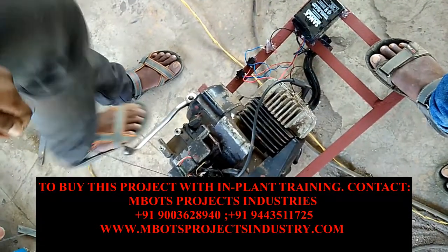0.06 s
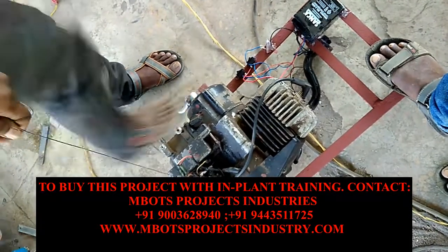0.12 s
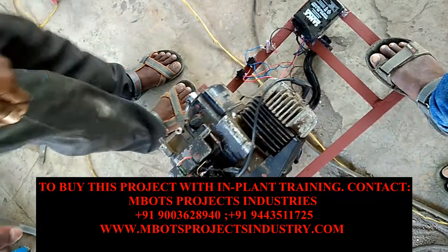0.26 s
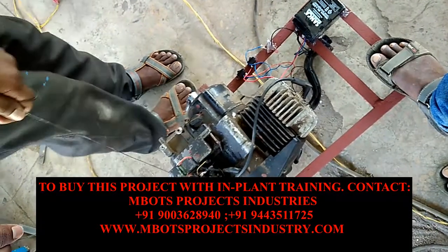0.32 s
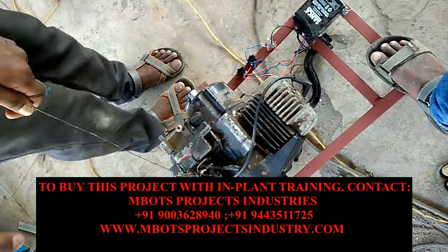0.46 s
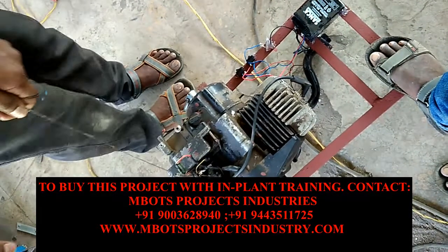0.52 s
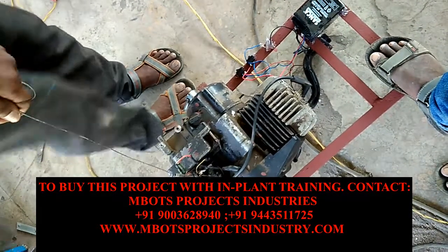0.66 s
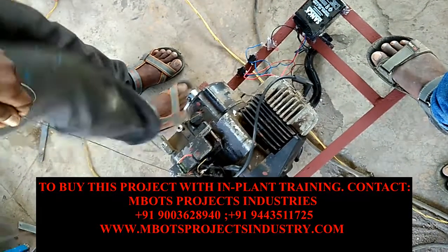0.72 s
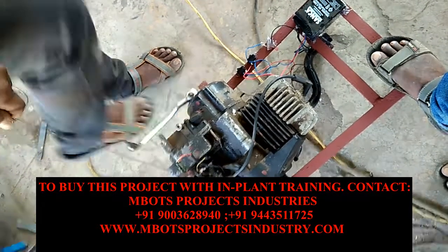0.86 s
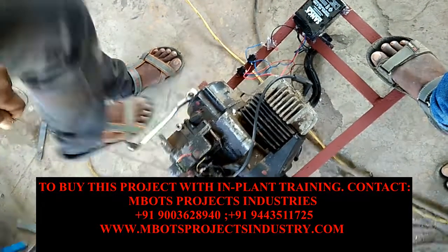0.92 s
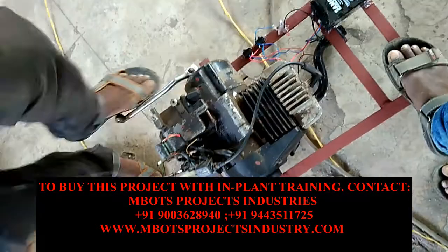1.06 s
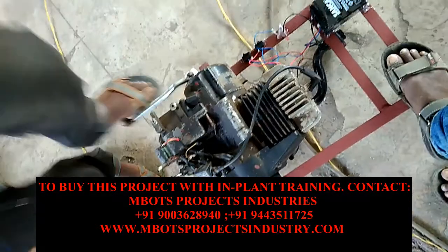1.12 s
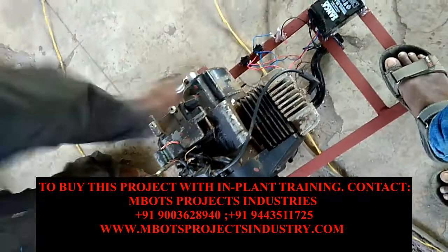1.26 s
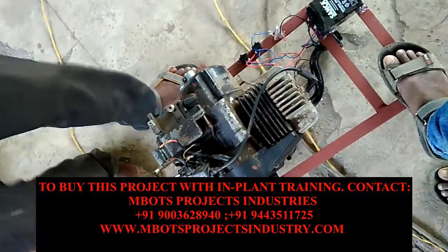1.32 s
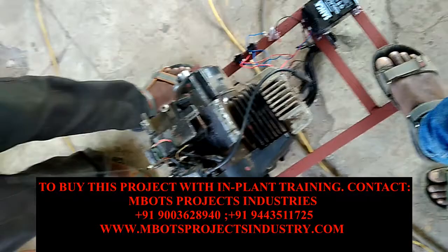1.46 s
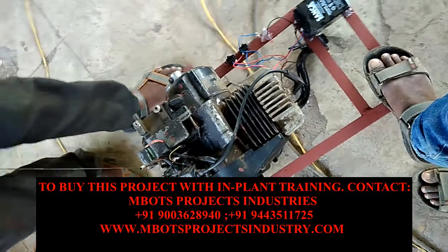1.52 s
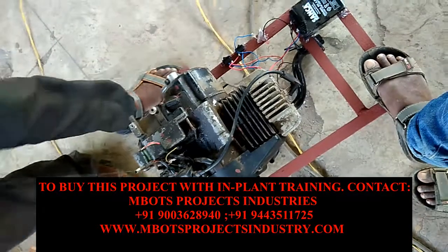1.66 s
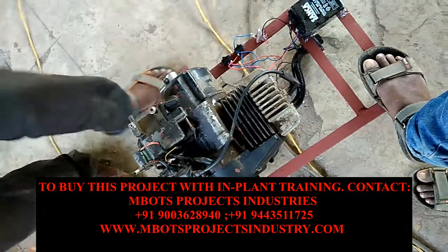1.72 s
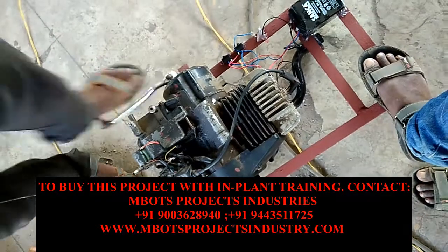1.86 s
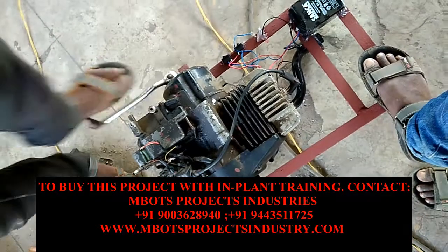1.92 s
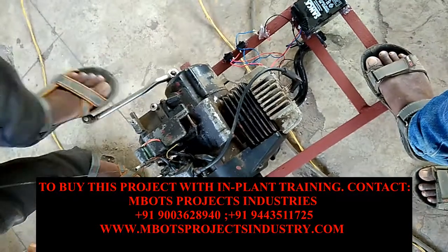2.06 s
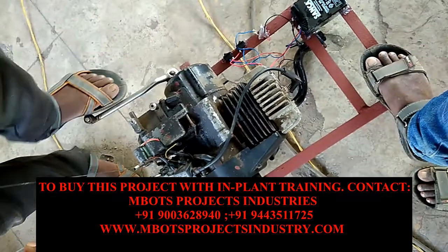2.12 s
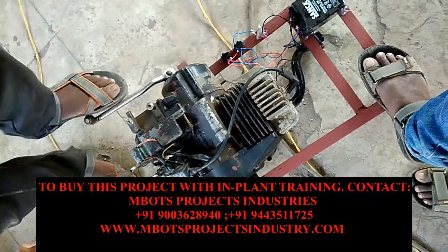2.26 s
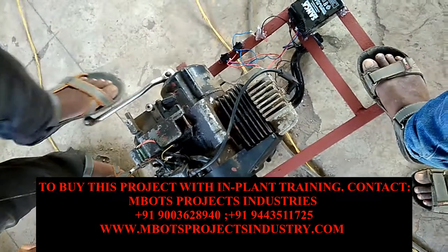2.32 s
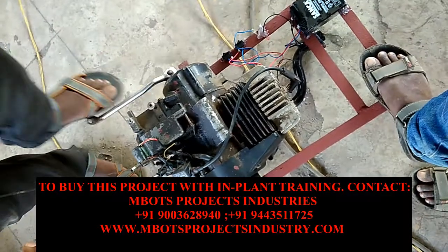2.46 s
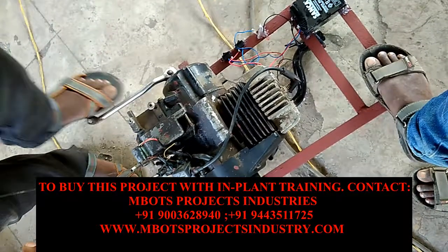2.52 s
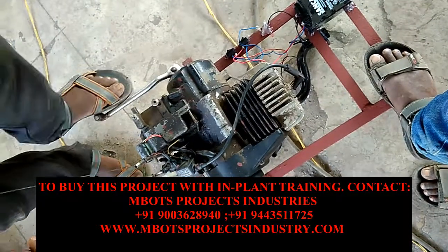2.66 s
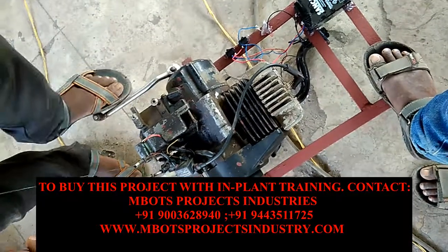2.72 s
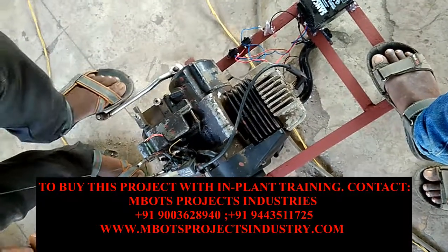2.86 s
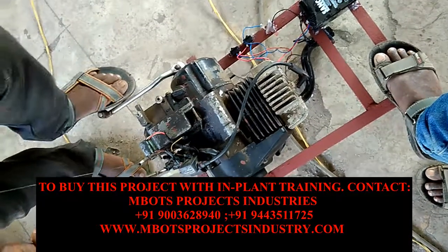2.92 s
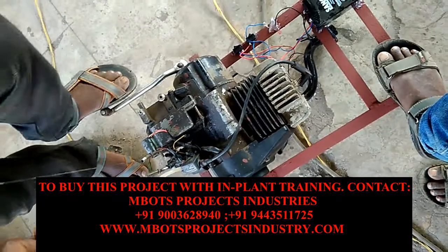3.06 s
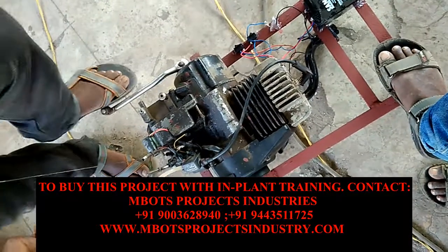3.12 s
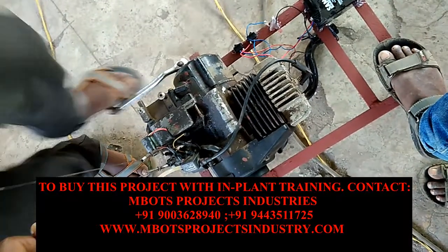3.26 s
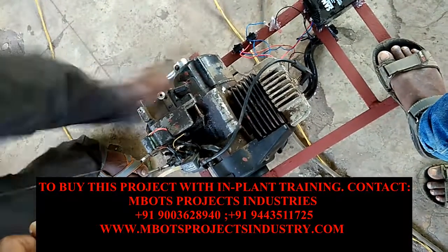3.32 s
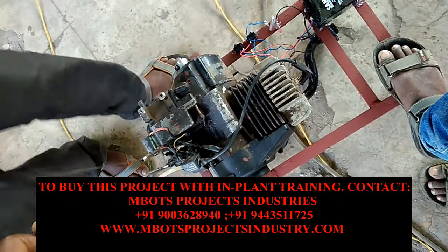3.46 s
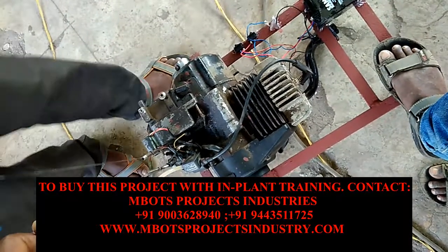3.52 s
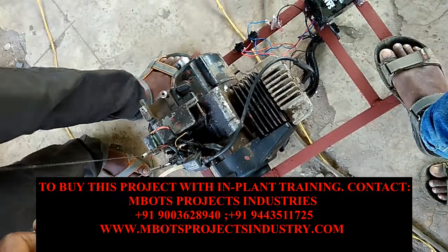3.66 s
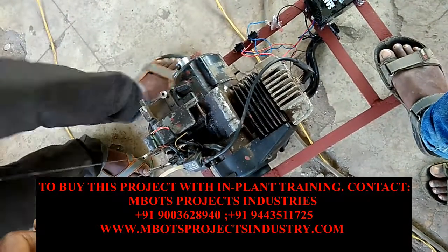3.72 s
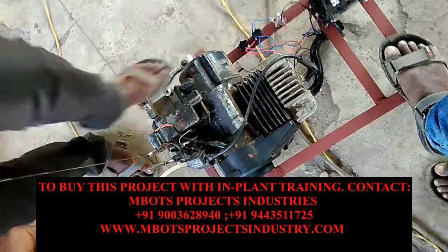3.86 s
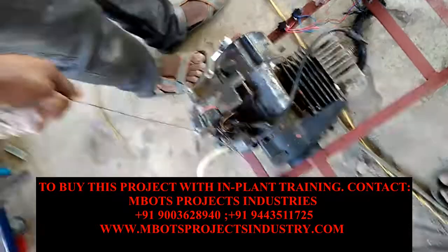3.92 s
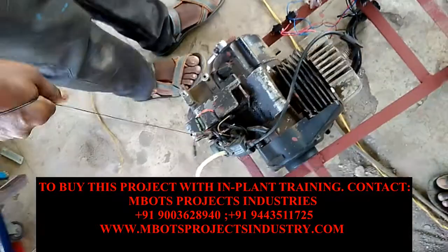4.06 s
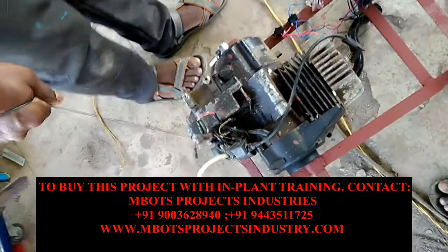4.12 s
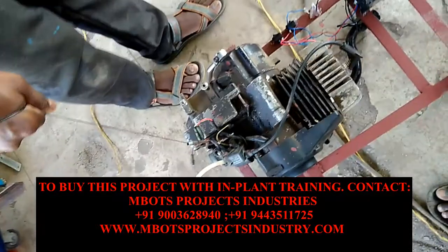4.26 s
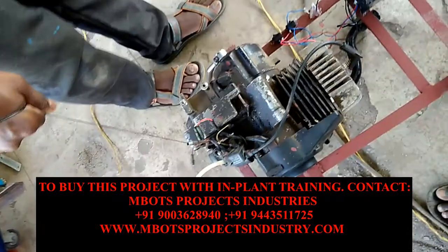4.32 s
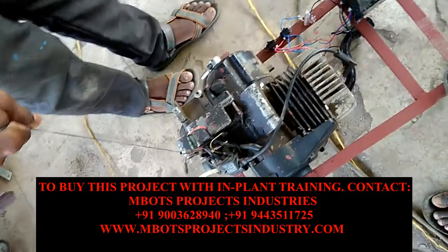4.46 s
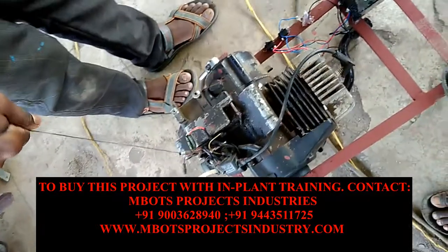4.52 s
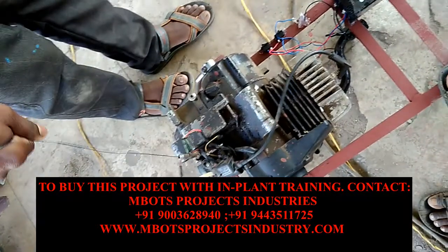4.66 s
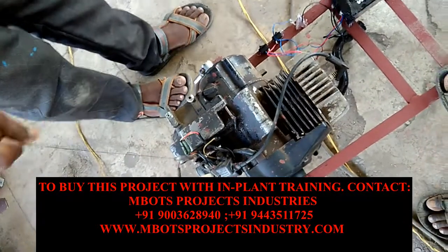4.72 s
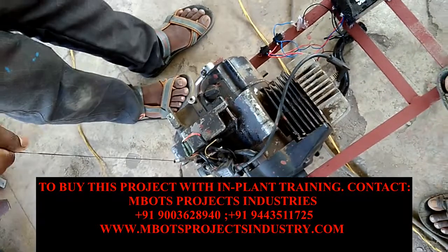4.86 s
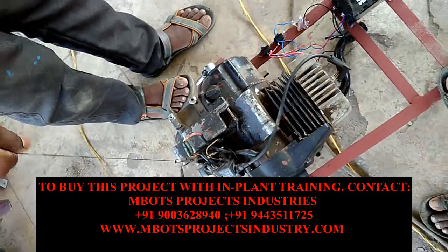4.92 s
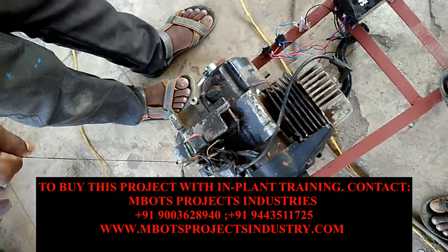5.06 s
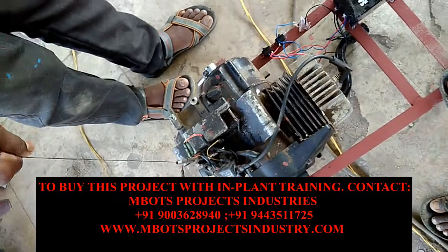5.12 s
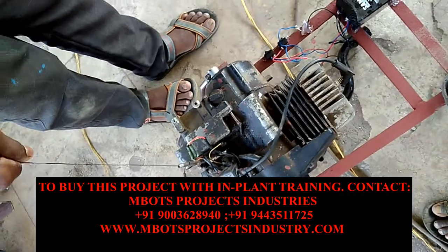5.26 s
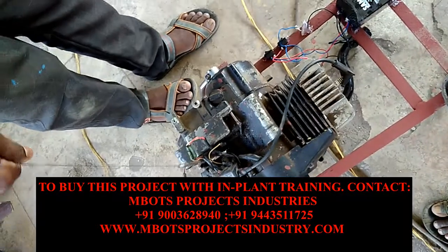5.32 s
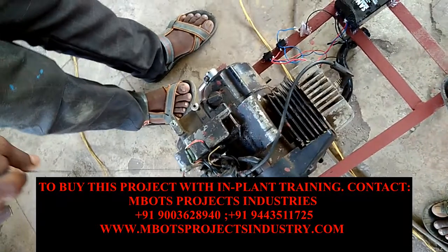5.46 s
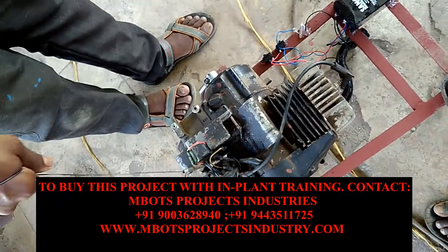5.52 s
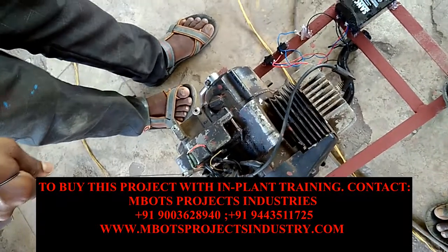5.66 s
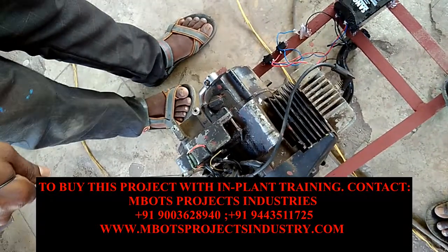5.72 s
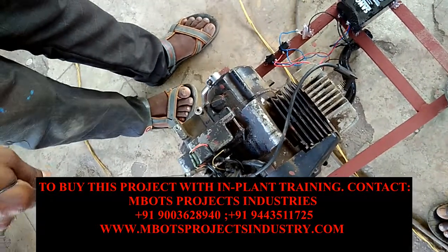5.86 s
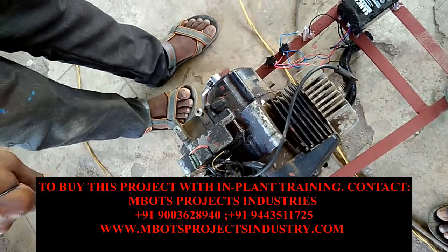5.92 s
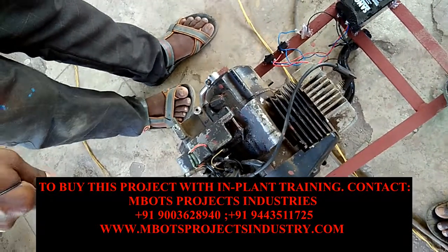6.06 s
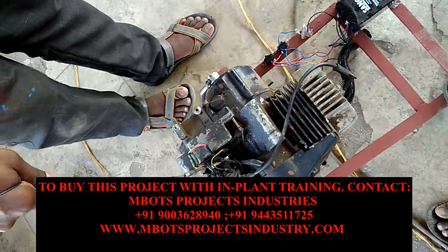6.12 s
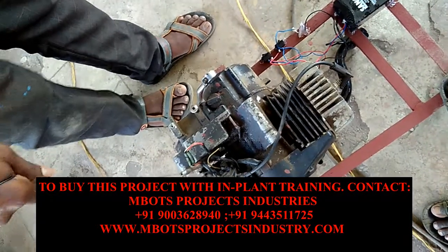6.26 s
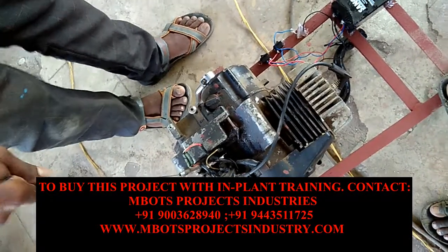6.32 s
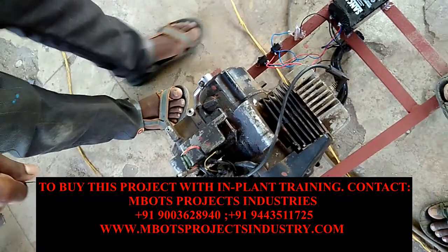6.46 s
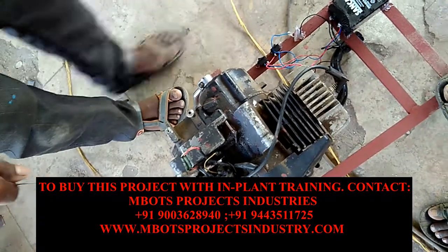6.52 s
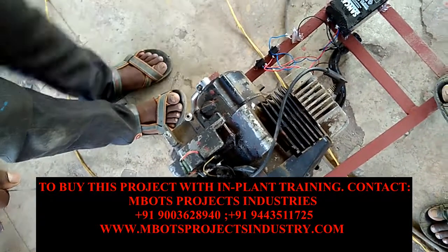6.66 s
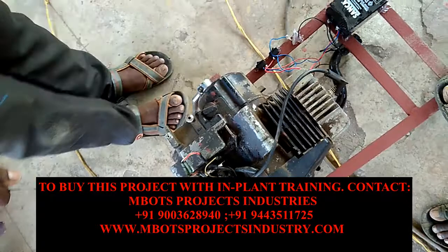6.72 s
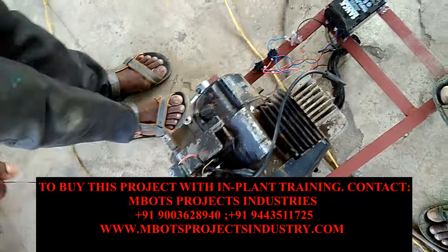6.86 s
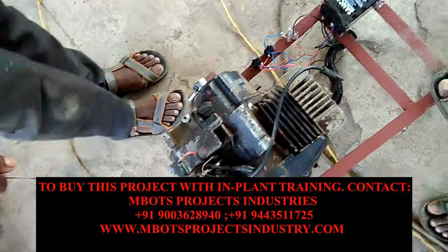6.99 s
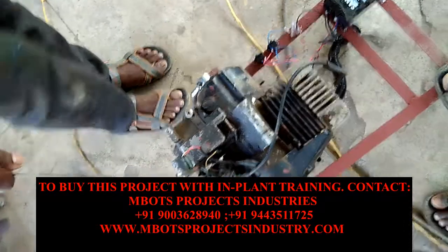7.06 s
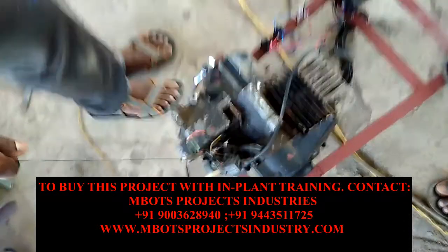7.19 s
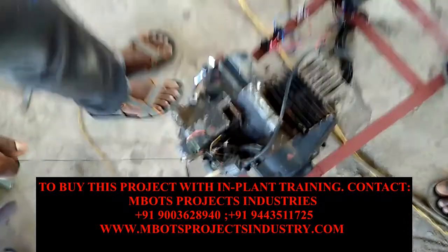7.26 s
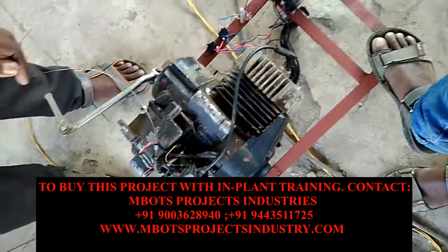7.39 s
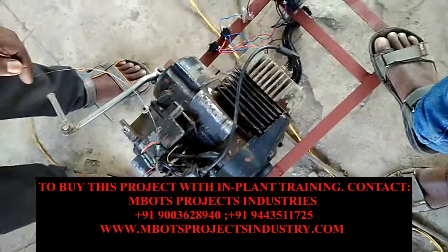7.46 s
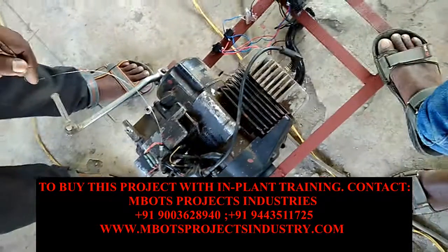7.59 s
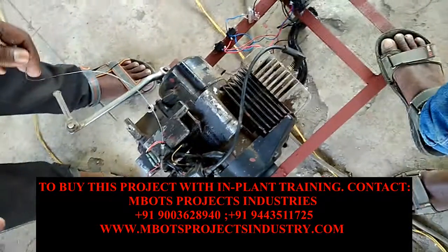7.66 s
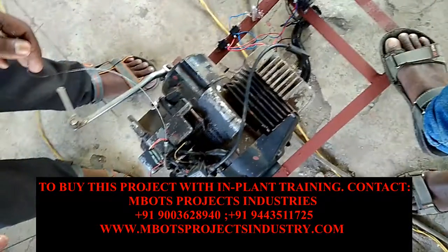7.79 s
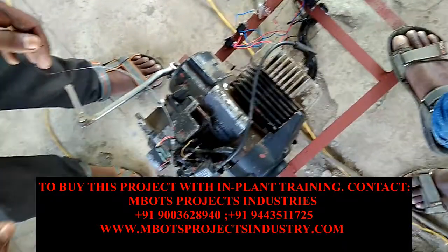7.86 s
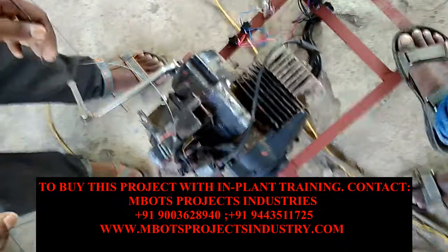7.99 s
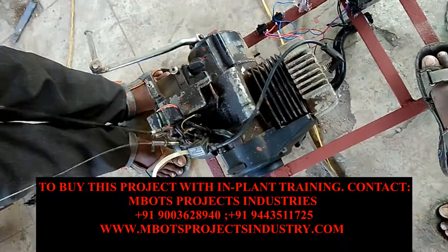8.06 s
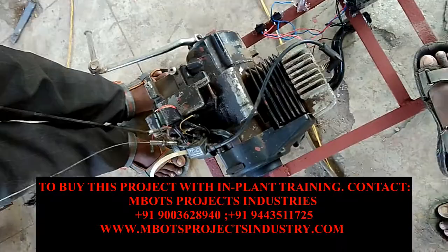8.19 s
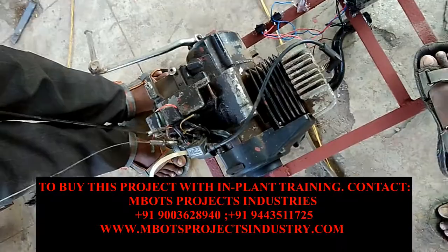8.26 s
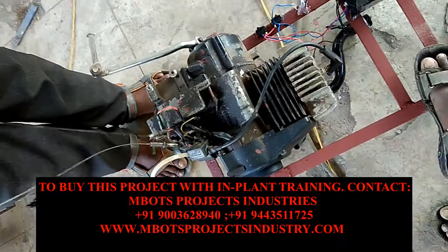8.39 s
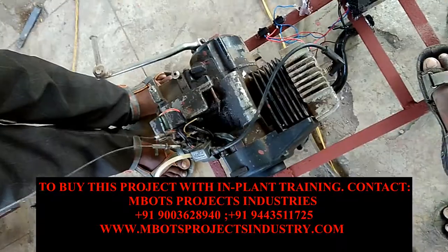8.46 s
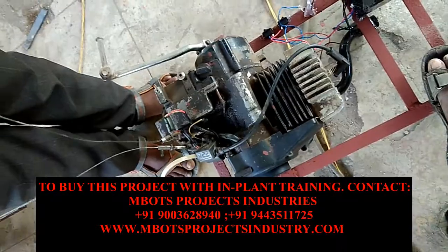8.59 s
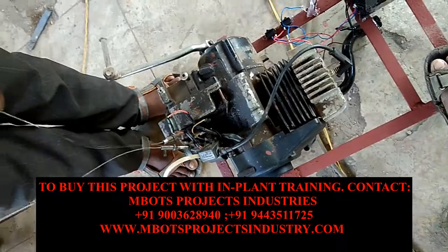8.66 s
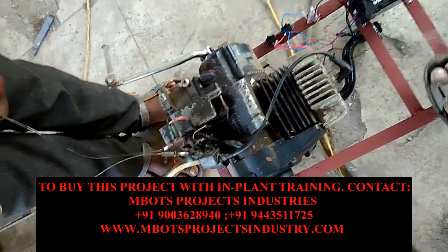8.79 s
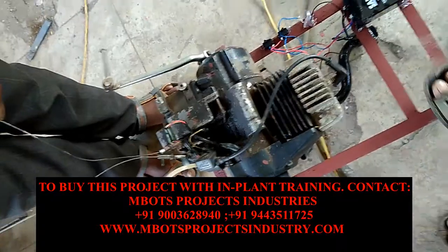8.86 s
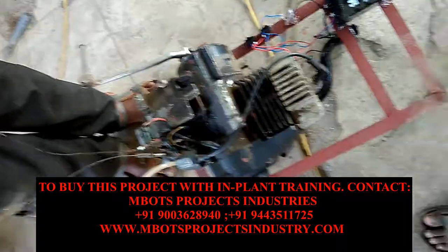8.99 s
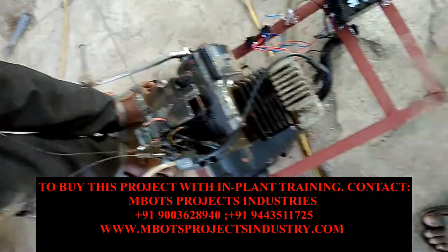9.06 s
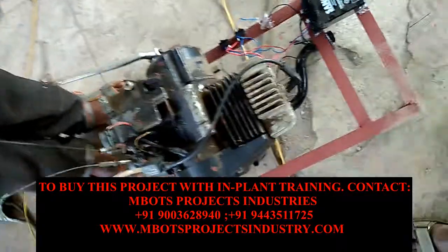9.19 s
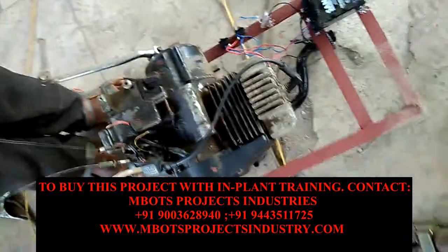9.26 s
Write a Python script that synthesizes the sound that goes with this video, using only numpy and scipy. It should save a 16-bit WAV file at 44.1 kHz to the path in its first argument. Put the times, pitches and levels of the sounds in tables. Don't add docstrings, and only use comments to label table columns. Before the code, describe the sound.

A small piston engine on a steel frame, heard very close in stereo, slightly stronger on the left, with short reflections from the concrete. Three kick strokes each click, whirr and chuff to a stop. Loud air jets then spin it into a quick, rough putter with a roaring pipe. The air stops, puffs slow and die, small spurts tick, and a short spin leads to a final run of hissing, buzzing pops.

```python
import sys
import numpy as np
from scipy import signal
from scipy.fft import rfft, irfft
from scipy.io import wavfile
from scipy.ndimage import uniform_filter1d

SR = 44100
rng = np.random.default_rng(int(sys.argv[2]) if len(sys.argv) > 2 else 0)


def pcm_store(signal):
    levels = np.round(np.clip(np.atleast_2d(signal), -1, 1) * 32767)
    wavfile.write(sys.argv[1], SR, levels.astype(np.int16).T)


def voltage_ratio(decibels):
    exponent = np.asarray(decibels, float) / 20
    return 10 ** exponent


N = 410571

# puff level/dB, pipe ring level/dB, puff f/Hz, swings to fade
STROKES = [(-22, -27, 140, .8), (-48.5, -42, 110, 0.28), (-23, -21.5, 130, .8), (-20, -22, 128, 0.64),
           (-43, -42, 100, 0.76), (-22, -22.5, 300, 3.5), (-20.5, -25.5, 330, 1.2), (-34, -29.5, 207, 1.3),
           (-40, -45, 160, 1.9), (-38, -27.5, 180, 1), (-38, -44, 210, 1.2), (-35.5, -35.5, 340, 1.7),
           (-42.5, -23.5, 310, 1.3), (-41, -31.5, 230, 1.1), (-23, -26.5, 297, 1.3), (-29, -30, 260, 1),
           (-29.5, -37, 190, 0.48), (-32.5, -38, 135, 0.31), (-38, -44, 104, 0.53), (-54.5, -62, 110, 0.59),
           (-33, -32.5, 252, 0.63), (-31, -42, 160, 0.59), (-27.5, -40, 123, 0.47), (-27.5, -37, 122, 0.29),
           (-37.5, -46.5, 140, 0.56), (-41, -46.5, 100, 0.4), (-42, -38.5, 330, 1.1),
           (-44.5, -36, 320, 0.82)]
# middle t/s, level/dB, half length t/s, f/Hz
FRAME_SHAKES = [(3.992, -32, 0.034, 703), (5.08, -18, 0.053, 706), (5.515, -17, 0.13, 610),
                (5.714, -12, 0.049, 687), (5.91, -19, 0.073, 726), (8.08, -17, 0.037, 614),
                (8.358, -26.5, 0.11, 680), (8.396, -20, .05, 445), (8.558, -29, .04, 400),
                (9.0, -14.5, 0.045, 613), (9.258, -15, 0.068, 622)]
# f/Hz, width f/Hz, level/dB
PIPE_MODES = [(300, 85, -7), (403, 30, -9), (215, 110, -11), (820, 110, -12), (1730, 110, -7)]
# f/Hz, width f/Hz, level/dB
WALL_MODES = [(300, 180, -0.5), (814, 99, -7.5), (1760, 160, -3.5)]
# f/Hz at rest, power by which pitch follows speed, swings to build up
PUFF = (92, 1.3, .46)
# level/dB, level/dB
DB_PER_HALVING = (15, 19)


def crank():
    puffs, pipe, frame = np.zeros((3, N))
    rest_hz, rise, build = PUFF
    middle, shake_db, half, shake_hz = np.transpose(FRAME_SHAKES)
    for at, (puff_db, pipe_db, first_hz, fade) in zip(strokes(), STROKES):
        speeds = 1 / np.gradient(at)
        for when, speed, chance in zip(at[:-1], speeds, rng.standard_normal((len(at), 5))):
            pace = speed / speeds[0]
            pace_db = np.array(DB_PER_HALVING) * np.log2(pace)
            hz = max(first_hz * pace ** rise, rest_hz) * (1 + 0.04 * chance[0])
            level = voltage_ratio(puff_db + pace_db[0] + chance[1])
            add(puffs, when + (.12 - 3 * build) / hz, level * puff(hz, build, fade))
            pipe[round((when - .002) * SR)] = voltage_ratio(pipe_db + pace_db[1] + 1.5 * chance[2])
            shake = voltage_ratio(shake_db) * np.exp(-((when - middle) / half) ** 2)
            note_hz = shake_hz[shake.argmax()] * (1 + 0.033 * chance[4])
            jolt = shake.sum() * voltage_ratio(1.5 * chance[3] - 7.5)
            add(frame, when - .004, jolt * damped(note_hz, t60=.045))
    blow = np.hanning(24) / np.hanning(24).sum()
    rush_decay = voltage_ratio(-60 * np.arange(2000) / SR / 0.042)
    rush = signal.oaconvolve(pipe, rush_decay)[:N] * rng.standard_normal(N)
    rings = ring(ring(voltage_ratio(39.5) * (voltage_ratio(-15) * rush - pipe), PIPE_MODES), WALL_MODES) + frame
    heard = puffs + signal.oaconvolve(rings, blow)[:N]
    return np.array([np.roll(heard, 5), heard])


def puff(hz, build, fade):
    u = np.arange(-3 * build, 4 * fade, hz / SR)
    swings = u - .28 - .05 * u * abs(u) / (1 + abs(u) / 2)
    return np.cos(2 * np.pi * swings) * np.exp(-np.where(u < 0, (u / build) ** 2 / 2, (u / fade) ** 2.1))


# start t/s, end t/s, turns, ratio of each turn's duration to the last
SPINS = [(.206, .586, 4, 1.28), (.586, .76, 1, 1), (1.315, 1.79, 4, 1.34), (3.429, 3.837, 4, 1.31),
         (3.837, 3.96, 1, 1), (3.968, 4.094, 5, 1), (4.094, 4.248, 5, 1.05), (4.248, 4.365, 3, 1.1),
         (4.365, 4.625, 8, .93), (4.625, 5.067, 16, .995), (5.067, 5.302, 8, 1), (5.302, 5.7, 20, .986),
         (5.7, 5.755, 3, 1), (5.755, 5.895, 7, 1), (5.895, 5.977, 4, 1), (5.977, 6.201, 9, 1.035),
         (6.201, 6.335, 4, 1.05), (6.335, 6.523, 4, 1.16), (6.523, 6.833, 3, 1.2), (6.833, 6.96, 1, 1),
         (7.312, 7.462, 6, 1.04), (7.462, 7.489, 1, 1), (7.489, 7.584, 3, 1.03), (7.584, 7.797, 5, 1.12),
         (7.797, 7.98, 2, 1.5), (7.98, 8.07, 1, 1), (8.075, 8.425, 15, 1), (8.425, 9.309, 37, 1)]


def strokes():
    for start, end, turns, factor in SPINS:
        lengths = factor ** np.arange(turns + 0.)
        yield start + (end - start) * np.append(0, np.cumsum(lengths)) / lengths.sum()


def angle():
    done = np.cumsum([0] + [row[2] for row in SPINS])
    turns = np.concatenate([before + np.arange(len(at)) for before, at in zip(done, strokes())])
    return np.interp(np.arange(N) / SR, np.concatenate(list(strokes())), turns)


def throb(depth_db, lag):
    return voltage_ratio(depth_db * np.cos(2 * np.pi * (angle() - lag)))


# f/Hz, level/dB per Hz
JET = [(1760, -20), (3000, -20), (3960, -22.5), (5310, -12.5), (5950, -11), (7690, -9), (8930, -3),
       (10500, 1), (12800, -8.5), (15600, -10), (16200, -46.5), (16500, -45.5)]
# f/Hz, level/dB per Hz
RATTLE = [(530, -31.5), (900, -4), (989, -11), (1220, -2), (1940, -10.5), (3070, -7.5), (3960, -12.5),
          (4500, -11), (5850, -21), (9900, -120)]


def air():
    jet = noise(JET, patchy_db=1.1, grain=1.8) * throb(.6, .1)
    pipe = voltage_ratio(-3) * roar() * throb(2.2, .08)
    casing = noise(RATTLE, patchy_db=2.8, grain=3.6) * throb(2.8, 0.055)
    return sum(level * x for level, x in zip(valve(), [jet, pipe, casing]))


# open t/s, shut t/s, jet level/dB, pipe and casing level/dB relative to the jet
BLOWS = [(3.959, 4.026, -20.5, -2.5, -15), (4.402, 4.662, -20.5, -6.5, -12), (4.636, 5.168, -20, -7, -12.5),
         (5.17, 5.267, -24.5, -6, -16), (5.319, 5.716, -20, -8, -9.5), (5.843, 5.938, -19.5, -16, -19.5),
         (8.041, 8.106, -19.5, -15, -26), (8.148, 8.557, -19, -14.5, -20),
         (8.653, 8.714, -19, -16.5, -21.5), (8.778, 8.98, -20.5, -20.5, -29.5),
         (9.064, 9.1, -20, -17, -23.5), (9.134, 9.271, -19.5, -19.5, -36)]


def valve():
    levels = np.zeros((3, N))
    fill_s = np.array([[.0045], [.03], [.01]])
    fall_db_per_s = np.array([[211], [137], [125.5]])
    seep_db, seep_db_per_s = np.array([[-32.5], [-19.5], [-31.5]]), 22.5
    for start, shut, jet_db, pipe_db, casing_db in BLOWS:
        part = levels[:, round(start * SR):round((shut + 1) * SR)]
        t = np.arange(part.shape[1]) / SR
        after = np.maximum(t + start - shut, 0)
        hold = voltage_ratio(jet_db + np.array([[0], [pipe_db], [casing_db]])) * np.minimum(t / fill_s, 1)
        release = voltage_ratio(-fall_db_per_s * after) + voltage_ratio(seep_db - seep_db_per_s * after)
        part[:] = np.maximum(part, hold * release)
    return levels


# f/Hz, level/dB per Hz
ROAR_BED = [(18, -47), (30, -22.5), (54, -15), (214, -11), (296, -7), (564, -12.5), (746, -13.5),
            (1000, -29.5), (1300, -54.5), (2200, -120)]


def roar():
    bed = noise(ROAR_BED, patchy_db=2.0, grain=0.63)
    return evened(bed + voltage_ratio(1.0) * ring(bed, PIPE_MODES))


# foot lands t/s, hardest t/s, gear whirr level/dB, crank at rest t/s
KICKS = [
    (0.181, 0.231, -35.5, 0.68),
    (1.281, 1.316, -37, 1.746),
    (3.345, 3.475, -36.5, 3.93),
]
# start t/s, hardest t/s, whirr level/dB, stop t/s, level/dB at stop
COASTS = [
    (0.09, 0.173, -65, 0.2, -67),
    (1.214, 1.236, -61, 1.21, -49),
    (4.102, 4.17, -59.5, 4.73, -65.5),
    (6.127, 6.16, -51.5, 6.8, -69),
    (7.297, 7.47, -45.5, 7.947, -67),
]
# middle t/s, level/dB, half length t/s
WHEEZES = [(0.148, -47.5, 0.011), (0.224, -39, 0.016), (0.31, -40, 0.0089), (0.392, -37, 0.012),
           (0.52, -46, 0.013), (1.33, -44, 0.032), (1.483, -40, 0.0081), (1.54, -48, 0.0099),
           (1.593, -43, 0.016), (1.684, -55, 0.014), (1.761, -54, 0.044), (1.947, -91, 0.024),
           (3.514, -41, 0.0049), (3.607, -47, 0.039), (3.68, -41.5, 0.0051), (3.765, -52, 0.034),
           (5.214, -21, 0.0016), (5.305, -23.5, 0.0036), (3.453, -34.5, 0.018), (6.991, -59.5, 0.022),
           (7.671, -43.5, 0.01), (8.617, -23, 0.0018), (9.01, -38, 0.0027), (9.0235, -22, 0.0027)]
# f/Hz, level/dB per Hz
WHIRR = [(410, -35.5), (700, -6), (1160, 5.5), (1270, 4.5), (2200, 3), (2560, 8), (4080, 0), (4910, 2.5),
         (6500, -17.5), (8450, -56.5), (14300, -120)]
# f/Hz, level/dB per Hz
LEAK = [(2650, -22.5), (4500, -20.5), (4960, -10), (7030, -11), (10300, -2), (11700, -11), (15500, -13.5),
        (16100, -32), (16500, -52)]
# f/Hz, width f/Hz, level/dB
CASTING_MODES = [(858, 69, 3), (1196, 18, 1.5), (1730, 70, -3.5)]
# middle t/s, level/dB, half length t/s, (f/Hz, width f/Hz, level/dB) of the sole
SCUFF = (2.87, -71.5, 0.05, [(1480, 680, 6.5), (2280, 760, -23.5)])


def coasting():
    gears = noise(WHIRR, patchy_db=1.8, grain=3.4)
    leak, swell = noise(LEAK, patchy_db=2.5, grain=2.5), np.zeros(N)
    for s, db, half in WHEEZES:
        add(swell, s - 3 * half, voltage_ratio(db) * signal.windows.gaussian(round(6 * half * SR), half * SR))
    kick_db_per_s, kick_leak_db, coast_leak_db = 67, -0.5, 3.5
    moves = [swing(s, top, db, rest, db - kick_db_per_s * (rest - top), kick_leak_db)
             for s, top, db, rest in KICKS]
    moves += [swing(*row, coast_leak_db) for row in COASTS]
    whirr = (gears + ring(gears, CASTING_MODES) + voltage_ratio(-3) * roar()) * throb(3.2, -.03)
    turning = played(moves, [whirr, leak * throb(2.5, .35)])
    s, db, half, sole = SCUFF
    scuff = voltage_ratio(db) * np.exp(-((np.arange(N) / SR - s) / half) ** 2) * ring(gears, sole)
    return turning + swell * (leak + voltage_ratio(-14.5) * gears) + scuff


def swing(start, top, db, stop, stop_db, leak_db):
    return [(start, db - 15, leak_db), (top, db, leak_db), (stop, stop_db, leak_db)]


def played(tables, layers, fade=0.059):
    out = np.zeros((2, N))
    for rows in tables:
        s, db, *relative = np.transpose(rows)
        t = np.arange(s[0], min(s[-1] + 3 * fade, N / SR), 1 / SR)
        at = slice(round(s[0] * SR), round(s[0] * SR) + len(t))
        size = len(out[0, at])
        gate = np.minimum((t - s[0]) / 0.0037, 1) * voltage_ratio(-20 * np.maximum(t - s[-1], 0) / fade)
        levels = [db] + [db + r for r in relative]
        sound = sum(voltage_ratio(np.interp(t, s, v))[:size] * x[:, at] for v, x in zip(levels, layers))
        add(out, s[0], gate[:size] * sound)
    return out


# t/s, peak level/dB, tail t60/s, treble level/dB relative
CLICKS = [(0.2537, -19.5, 0.2, 1), (0.775, -55, 0.19, -30), (0.807, -36.5, 0.098, -2.5),
          (0.848, -38, 0.11, -2.5), (0.8829, -49.5, 0.36, -2), (1.081, -69, 0.012, -10),
          (1.165, -43, 0.18, -35.5), (1.218, -36, 0.12, 1), (1.232, -25.5, 0.098, -9),
          (1.3372, -19, 0.039, -14), (1.343, -25, 0.034, -13.5), (1.916, -60, 0.5, -12),
          (2.172, -42.5, 0.1, -5), (2.182, -38.5, 0.25, -5), (2.2083, -42.5, 0.06, -10),
          (2.4384, -41, 0.13, -6), (2.565, -44, 0.11, -3), (2.5762, -37.5, 0.077, -16),
          (2.5945, -41, 0.23, -4.5), (3.2908, -49, 0.54, -12.5), (3.334, -28.5, 0.11, -8),
          (3.3442, -26.5, 0.041, 1.5), (3.451, -26, 0.04, -16.5), (3.459, -17, .04, -16.5),
          (3.4665, -15.5, 0.04, -14.5), (3.476, -31, 0.042, -8)]
# t/s, peak level/dB, tail t60/s, treble level/dB relative
SPURTS = [(6.154, -47.5, 0.22, 32.5), (6.3335, -40.5, 0.14, 8), (6.522, -40, 0.025, 30),
          (6.5974, -47, 0.039, 24), (6.642, -35, 0.076, 8.5), (6.744, -36.5, 0.057, 22),
          (6.927, -36.5, 0.079, 8), (7.07, -68.5, .03, -22.5), (7.11, -64, 0.11, -25),
          (7.2782, -78, 0.055, -9), (7.445, -33.5, 0.094, 17), (7.814, -33, 0.12, 15),
          (7.971, -51.5, 0.26, 1), (8.021, -35, 0.053, 14.5), (9.278, -16.5, 0.035, 19)]
# f/Hz, level/dB per Hz
CLICK = [(410, -41), (700, -22.5), (1330, -16), (2220, -4.5), (2570, -1), (4200, -7), (4950, -15),
         (7000, -24), (9100, -51.5), (15400, -120)]


def clicks():
    out = np.zeros((2, N))
    body = noise(CLICK, patchy_db=2.2, grain=3.0)
    treble = noise(LEAK, patchy_db=2.5, grain=2.0)
    for s, db, t60, treble_db in CLICKS + SPURTS:
        length_s = np.clip(t60, .01, min(.5, N / SR - s - .001))
        t = np.arange(round(length_s * SR)) / SR
        airy = np.clip(treble_db / 10, 0, 1)
        rise = np.minimum(t / (.0025 + .012 * airy), 1)
        shape = rise * ((1 - airy) * voltage_ratio(-60 * t / .015) + .45 * voltage_ratio(-60 * t / t[-1]))
        at = slice(round(s * SR), round(s * SR) + len(t))
        add(out, s, voltage_ratio(db - 2.0) * shape * (body[:, at] + voltage_ratio(treble_db) * treble[:, at]))
    return out


# t/s, peak level/dB, f/Hz, t60/s
KNOCKS = [(1.083, -52, 110, 0.013), (1.098, -38, 76, 0.029), (1.171, -52, 82, 0.04),
          (2.214, -64, 192, 0.064), (2.607, -58, 178, 0.022), (2.682, -47, 68, 0.017),
          (2.744, -62.5, 69, 0.13), (2.772, -60, 187, 0.048), (2.796, -45, 74.5, 0.025),
          (2.857, -53.5, 87, 0.017), (2.887, -58, 77.5, 0.02), (2.935, -66.5, 240, .02),
          (2.986, -69, 270, .02), (3.03, -68, 250, .03), (5.92, -31, 70, .03), (6.27, -33, 60, 0.032),
          (.93, -64, 60, .05), (8.165, -33, 50, .02), (8.21, -30, 55, .02), (8.25, -30, 45, .02),
          (8.365, -29, 55, .03), (3.085, -51.5, 122, 0.0093), (8.189, -46, 326, 0.026),
          (8.827, -30.5, 200, 0.021), (8.874, -32, 60, 0.031), (9.143, -25, 58.7, 0.012),
          (9.19, -33, 64.4, 0.042)]
# t/s, peak level/dB, f/Hz, t60/s
LEVER = [(1.234, -52, 610, 0.12), (1.336, -23, 890, 0.0066), (1.339, -20, 1390, 0.0069),
         (6.261, -48, 1400, 0.011), (6.296, -41, 1550, 0.012), (2.21, -59.5, 580, 0.15),
         (2.211, -66, 618, .1), (2.8, -75, 590, .2), (2.67, -76, 592, .15), (1.4, -61, 450, .003),
         (0.67, -50.5, 1250, 0.023), (0.68, -57, 820, .02), (2.597, -63, 595, 0.17),
         (7.862, -58, 923, 0.13)]


def knocks():
    out = np.zeros((2, N))
    for s, db, hz, t60 in KNOCKS + LEVER:
        port_gain = voltage_ratio(np.array([[1.0], [-5.]]) * (hz < 100))
        add(out, s, voltage_ratio(db + 8.5) * damped(hz, t60 + 3 / hz) * port_gain)
    return out


def damped(hz, t60):
    t = np.arange(round(t60 * SR)) / SR
    return np.sin(2 * np.pi * hz * t) * voltage_ratio(-60 * t / t60) * (1 - np.exp(-(3 * hz * t) ** 2))


def yard(x):
    t = np.arange(round(.25 * SR)) / SR
    signs = rng.choice([-1., 1.], (2, len(t)))
    present = rng.random((2, len(t))) < 2000 / SR
    taps = signs * present * voltage_ratio(-60 * t / 0.097) * (t > .003)
    return signal.oaconvolve(x, taps / np.linalg.norm(taps[0]), axes=1)[:, :N]


# f/Hz, level/dB per Hz
FLOOR = [(18, -37), (30, -0.5), (70, 1), (384, -12.5), (426, -22.5), (2480, -23), (3770, -36), (16000, -17)]


def floor():
    return voltage_ratio(-75.5) * noise(FLOOR, patchy_db=4.0)


# f/Hz, left-right likeness 0..1
SAME = [(25, .3), (70, 0.78), (180, 0.97), (550, 0.74), (1650, 0), (4970, 0), (15000, 0.0022)]


def noise(spectrum, patchy_db=6.0, grain=0.):
    grit = voltage_ratio(grain * uniform_filter1d(rng.standard_normal(N + 2048), size=24) * np.sqrt(24))
    hz, _, z = signal.stft(rng.standard_normal((2, N + 2048)) * grit, SR, nperseg=1024)
    same = np.clip(read(SAME, hz), 0, 1)[:, None]
    z[1] = same * z[0] + np.sqrt(1 - same ** 2) * z[1]
    patches = uniform_filter1d(rng.standard_normal(z[0].shape), size=10, axis=0)
    patches = evened(uniform_filter1d(patches, size=5, axis=1))
    gain = voltage_ratio(read(spectrum, hz)[:, None] + patchy_db * patches)
    return evened(signal.istft(z * gain, nperseg=1024)[1][:, :N])


def ring(x, modes):
    out = np.zeros_like(x)
    for hz, width, db in modes:
        r = np.exp(-np.pi * width / SR)
        pole = r * np.exp(2j * np.pi * hz / SR)
        out += voltage_ratio(db) * 2 * signal.lfilter([1 - r], [1, -pole], x).real
    return out


def evened(x):
    return x / np.sqrt(np.mean(x ** 2) + 1e-20)


def read(points, hz):
    f, value = np.transpose(points)
    return np.interp(np.log(hz + 1), np.log(f + 1), value)


def add(mix, s, sound):
    part = mix[..., round(s * SR):][..., :sound.shape[-1]]
    part += sound[..., :part.shape[-1]]


def scene():
    thumps, ticks = crank() + knocks(), clicks()
    near = thumps + ticks + yard(voltage_ratio(-7) * thumps + voltage_ratio(-6) * ticks)
    return near + air() + coasting() + floor()


def top_cut(x):
    return signal.sosfilt(signal.butter(12, 16980, fs=SR, output="sos"), x)


# f/Hz, left minus right level/dB
LEAN = [(30, 3), (60, 3), (240, 6.5), (600, 3.5), (1200, 4), (2400, 7), (5000, 1.2), (15000, 1.9)]


def record(dry):
    hz = np.fft.rfftfreq(N, 1 / SR)
    lean = read(LEAN, hz) / 2
    bass = 1 / np.sqrt(1 + (42 / (hz + 1)) ** 4)
    ports = irfft(rfft(dry, axis=1) * bass * voltage_ratio(np.array([lean, -lean])), N, axis=1)
    ceiling = .62
    mix = ceiling * np.tanh(ports / ceiling)
    return top_cut(mix)


dry = scene()
out = record(dry)
pcm_store(out)
```